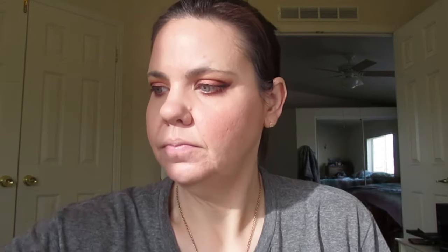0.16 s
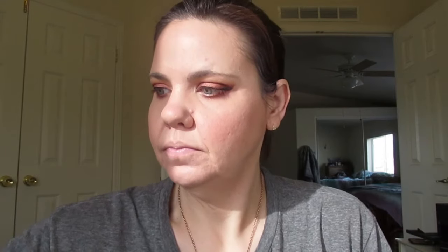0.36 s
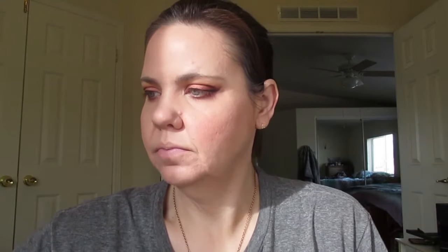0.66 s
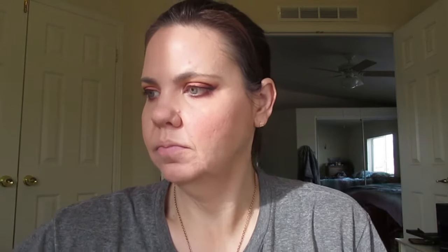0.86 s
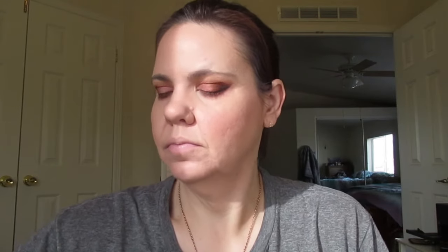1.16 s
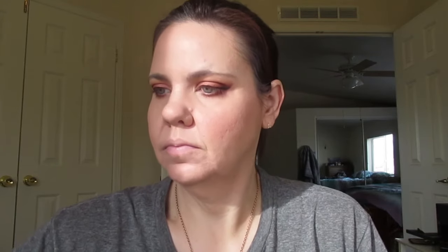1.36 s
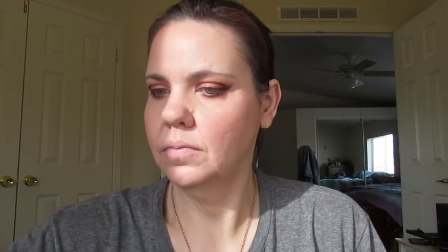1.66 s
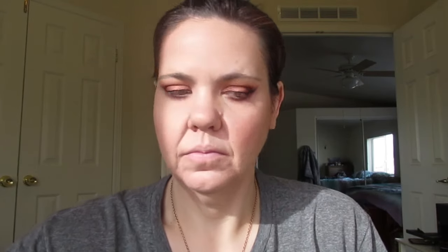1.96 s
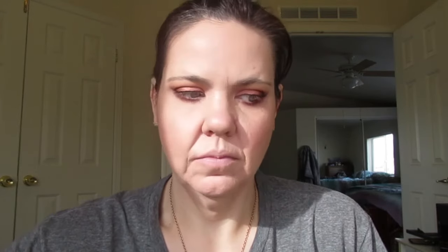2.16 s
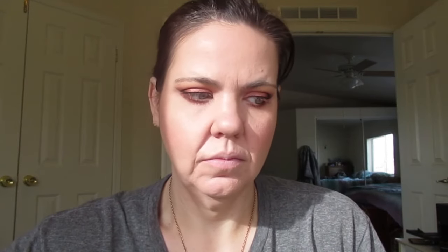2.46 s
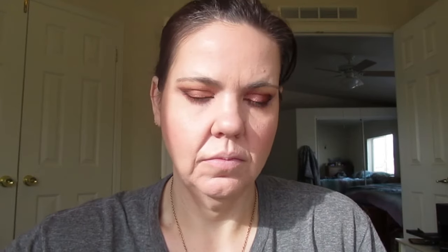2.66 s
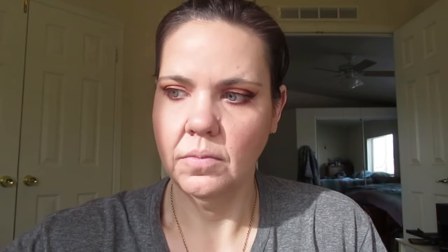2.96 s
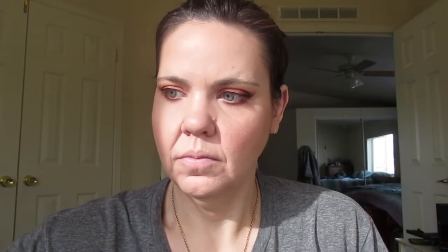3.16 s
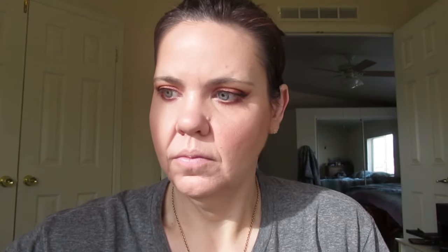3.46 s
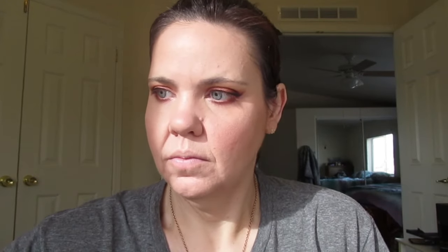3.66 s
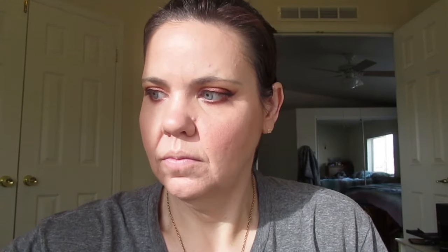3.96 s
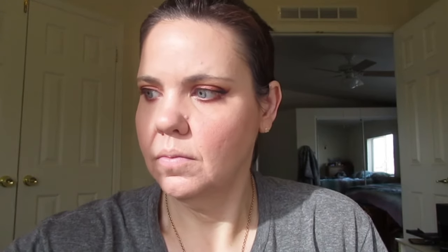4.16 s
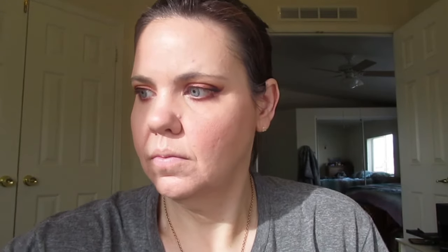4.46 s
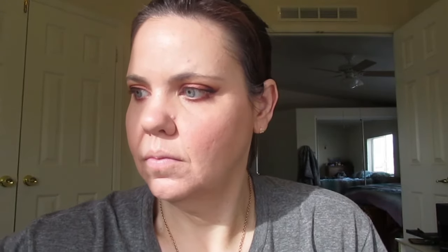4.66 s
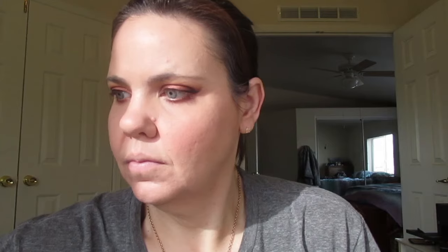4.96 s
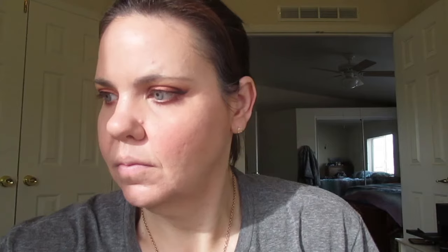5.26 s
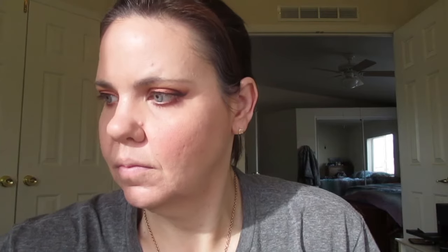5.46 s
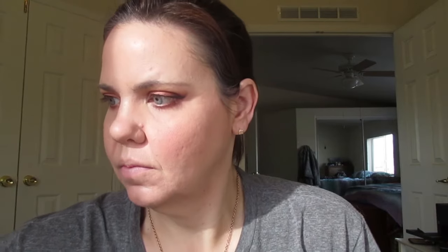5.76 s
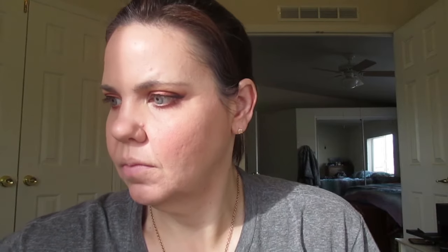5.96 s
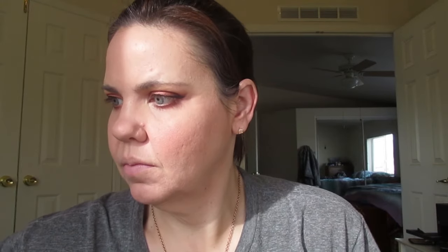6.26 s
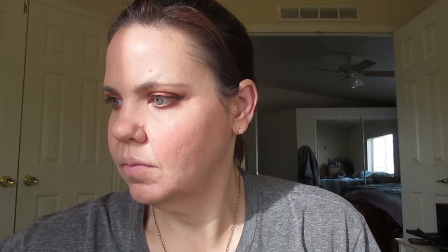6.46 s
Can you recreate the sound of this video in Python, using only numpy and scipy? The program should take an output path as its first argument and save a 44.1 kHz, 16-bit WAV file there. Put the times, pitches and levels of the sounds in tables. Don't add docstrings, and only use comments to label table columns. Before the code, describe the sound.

Close, uneven rummaging through small hard make-up containers, with hollow knocks, a sharp lid snap, short scrapes and faint room hum behind.

```python
import sys
import numpy as np
from scipy import signal
from scipy.fft import rfft, irfft
from scipy.io import wavfile

SR = 44100
rng = np.random.default_rng(int(sys.argv[2]) if len(sys.argv) > 2 else 0)


def natural_amplitude(level_db):
    exponent = np.asarray(level_db, float) / 20
    return 10 ** exponent


def transcribe(signal):
    frames = np.atleast_2d(signal).T
    limited = np.clip(frames, -1, 1)
    pcm = np.round(limited * 32767).astype(np.int16)
    wavfile.write(sys.argv[1], SR, pcm)


N = 291093
PLACES = 3

# [mode_hz, level_db]
PANEL_MODES = [(115, -48.5), (190, 0), (235, 4.5), (287, 1.5), (345, 3.5)]
# [mode_hz, level_db]
BOX_MODES = [(490, -4.5), (543, -27.5), (582, 4.5), (625, -3), (727, 5), (790, -9.5), (877, 3.5),
             (951, -10.5), (1017, 1.5)]
# [mode_hz, level_db]
CASE_MODES = [(1120, 3.5), (1330, 2.5), (1490, 0.5), (1600, -2), (1705, -2.5), (1880, 1), (2068, 3),
              (2280, 0), (2500, -0.5)]


def rms_one(x):
    return x / np.sqrt(np.mean(x ** 2) + 1e-20)


def at_hz(points, hz):
    table_hz, value = np.array(points)[:, 0], np.array(points)[:, 1]
    return np.interp(np.log(hz + 1), np.log(table_hz), value)


def coloured(x, spectrum):
    hz = np.arange(len(x) // 2 + 1) * SR / len(x)
    walled = [(spectrum[0][0] / 2, spectrum[0][1] - 30), *spectrum]
    return rms_one(irfft(rfft(x) * natural_amplitude(at_hz(walled, hz)), len(x)))


def drift(rate_hz):
    knots = rng.standard_normal(int(N / SR * rate_hz) + 2)
    return np.interp(np.arange(N) / SR * rate_hz, np.arange(len(knots)), knots)


def ring_s(hz):
    return 0.9 / np.sqrt(hz)


def house():
    # [freq_hz, level_db]
    hum_colour = [(12, -37), (20, -21), (64, -1), (86, -7.5), (176, 1.5), (282, -5.5), (315, -7.5),
                  (392, -3), (719, -10.5), (922, -8.5), (1210, -12), (1840, -11.5), (1990, -15.5),
                  (6890, -22.5), (14500, -28)]
    # [time_s, level_db]
    hum_swell = [(0, -43.5), (.45, -55.5), (1.5, -51), (3.55, -49), (4.7, -50), (6.6, -49)]
    # [line_hz, rms_db]
    mains_lines = [(60, -75), (118, -65.5)]
    t = np.arange(N) / SR
    out = coloured(rng.standard_normal(N), hum_colour) * natural_amplitude(np.interp(t, *np.transpose(hum_swell)))
    for hz, db in mains_lines:
        out += natural_amplitude(db + 0.5 + 2 * drift(7.7)) * np.sin(2 * np.pi * hz * t)
    return out


def room(x):
    # [freq_hz, t60_s]
    room_t60 = [(150, 0.39), (400, 0.29), (1000, 0.38), (2800, 0.35), (7300, 0.28), (15000, 0.13)]
    # [freq_hz, level_db]
    room_colour = [(150, 0), (400, 0.5), (700, -2), (1500, 2), (4000, 0), (12000, 0)]
    t, tail = np.arange(SR // 2) / SR, 0
    band_edges = np.geomspace(40, 20000, 10)
    for low, high in zip(band_edges, band_edges[1:]):
        centre_hz = np.sqrt(low * high)
        bandpass = signal.butter(2, [low, high], "band", fs=SR, output="sos")
        band = signal.sosfilt(bandpass, rng.standard_normal(len(t)))
        tail = tail + band * natural_amplitude(at_hz(room_colour, centre_hz) - 60 * t / at_hz(room_t60, centre_hz))
    tail = tail * np.clip((t - 0.003) / 0.0026, 0, 1)
    return natural_amplitude(-5.5) * signal.fftconvolve(x, tail / np.sqrt(np.sum(tail ** 2)))[:N]


def jolts():
    # [start_s, peak_db, swing_hz]
    shoves = [(1.586, -35.5, 115.3), (3.035, -28, 131.6), (3.109, -52, 135), (3.779, -38, 78.5),
              (4.125, -34.5, 118), (4.898, -35.5, 115), (5.543, -52, 128), (5.659, -35, 58.4),
              (5.678, -46, 119.5), (4.14, -41, 55), (3.7, -46, 101), (6.399, -45, 108)]
    since = np.maximum(np.arange(N) / SR - np.array(shoves)[:, :1], 0)
    db, hz = np.array(shoves).T[1:, :, None]
    envelope = natural_amplitude(db - 5.5 - 60 * since / 0.45) * (1 - np.exp(-since / 0.014))
    return (envelope * np.sin(2 * np.pi * hz * since)).sum(axis=0)


def strokes(t):
    # [time_s, level_db]
    drags = [
        [(3.6, -58), (3.71, -43.5), (3.83, -35.5), (4.0, -31), (4.2, -36), (4.28, -44), (4.42, -69)],
        [(5.42, -43), (5.49, -37), (5.71, -40.5), (5.85, -42), (6.1, -42.5), (6.28, -44.5), (6.44, -44),
         (6.6, -93)],
    ]
    # [start_s, length_s, rub_db, hiss_db]
    scuffs = [
        (0.0, 0.0082, -26, -56),
        (0.703, 0.078, -45, -51.5),
        (2.132, 0.019, -39.5, -43),
        (2.407, 0.064, -49, -72),
        (3.666, 0.0052, -28, -48),
        (3.727, .006, -19.5, -48),
        (3.79, 0.036, -25.5, -59),
        (4.333, 0.0079, -32, -45),
        (4.904, 0.028, -38.5, -42.5),
        (5.274, 0.049, -22, -33.5),
    ]
    rub_over_hiss_db = 6.5
    rise_db_per_s, fall_db_per_s = 475, 304
    gain = np.zeros((2, N))
    for drag in drags:
        s, db = np.transpose(drag)
        fade = np.clip(np.minimum(t - s[0], s[-1] - t) / 0.02 + 0.5, 0, 1)
        gain += fade * natural_amplitude(np.interp(t, s, db) + np.array([[rub_over_hiss_db], [0]]))
    for s, length, *db in scuffs:
        lost_db = rise_db_per_s * np.maximum(s - t, 0) + fall_db_per_s * np.maximum(t - s - length, 0)
        gain += natural_amplitude(np.array(db)[:, None] - lost_db)
    return gain


def slides():
    # [freq_hz, density_db_per_hz]
    rub_colour = [(59, -43), (100, -16.5), (289, 0.5), (414, -6), (564, 1.5), (795, -1.5), (943, 3.5),
                  (1520, -5), (2500, -5.5), (4190, -21), (6000, -21.5), (7800, -46), (13200, -120)]
    # [freq_hz, density_db_per_hz]
    hiss_colour = [(2060, -11.5), (3500, -12), (4090, -16), (6890, -13), (10000, -17.5), (11700, -18.5),
                   (14500, -23.5)]
    t = np.arange(N) / SR
    rub_gain, hiss_gain = strokes(t)
    slips_per_s = 3500
    slips = (rng.random(N) < slips_per_s / SR) * rng.laplace(size=N) * natural_amplitude(5.1 * drift(35))
    rub = coloured(slips, rub_colour)
    hz, db = np.array(PANEL_MODES + BOX_MODES + CASE_MODES).T[:, :, None]
    ring_t = t[:SR // 5]
    body = (natural_amplitude(db - 60 * ring_t / ring_s(hz)) * np.sin(2 * np.pi * hz * ring_t)).sum(axis=0)
    boxed = rms_one(signal.fftconvolve(rub, body)[:N])
    hiss = coloured(rng.standard_normal(N), hiss_colour) * natural_amplitude(drift(40))
    return natural_amplitude(-9) * (rub_gain * rms_one(rub + 0.4 * boxed) + hiss_gain * hiss)


def pings():
    # [start_s, peak_db, pitch_hz]
    case_pings = [(.0625, -8, 1900), (.049, -14, 3000), (.108, -20, 3220), (.207, -18, 1187),
                  (.519, -45, 2680), (1.573, -2, 1530), (1.826, -5, 1520), (1.887, -21, 2540),
                  (1.9235, -5.5, 1150), (1.9884, -11, 1006), (2.349, -31, 2430), (2.466, -11.5, 1603),
                  (2.467, -19, 3460), (2.693, -28, 2260), (2.889, -19, 2310), (3.033, -20, 1560),
                  (3.033, -9, 4560), (3.06, -13, 2700), (3.787, -17, 3130), (3.1164, -10, 1063),
                  (3.168, -20, 2380), (3.346, -24, 2060), (3.786, -13, 1040), (1.827, -15, 2170),
                  (4.14, -17, 1050), (5.536, -10, 2050), (5.547, -15.5, 2600), (5.855, -24.5, 1930),
                  (5.27, -19, 1960), (5.308, -20, 1800)]
    # [start_s, peak_db, pitch_hz]
    dry_taps = [(1.826, -11.5, 293), (2.963, -13, 700), (3.166, -12, 670), (3.418, -23, 625),
                (3.66, -15, 285), (3.712, -16, 600), (3.738, -7, 281), (3.756, -14, 290),
                (4.297, -14.5, 286), (5.536, -16, 197), (5.715, -13.5, 720), (6.41, -26, 200),
                (6.05, -31, 1300), (3.859, -15, 1070), (3.77, -14, 700), (.065, -12, 550)]
    t, out = np.arange(SR // 6) / SR, np.zeros(N + SR)
    for table, t60_cycles in [(case_pings, 45), (dry_taps, 27)]:
        for s, db, hz in table:
            pair = np.sin(2 * np.pi * hz * t) + 0.21 * np.sin(2 * np.pi * hz * 1.077 * t)
            envelope = natural_amplitude(db - 3 - 60 * t * hz / t60_cycles) * (1 - np.exp(-t * hz / 0.94))
            at = round(s * SR)
            out[at:at + len(t)] += envelope * pair
    return out[:N]


def contacts():
    # [start_s, strength_db, hardness_db, pitch_hz]
    thuds = [(.519, -43, -15, 690), (.687, -44, -28, 600), (.77, -43, -24, 497), (.793, -29.5, -49, 430),
             (.931, -32.5, -48, 636), (1.826, -4.5, -28.5, 770), (2.009, -31, -22, 573),
             (2.536, -34.5, -24, 573), (2.753, -31.5, -28, 606), (3.034, -4.5, -12.5, 510),
             (3.083, -15.5, -17, 707), (3.214, -30, -21, 690), (3.326, -15, -22, 634),
             (3.725, -7, -54, 454), (3.73, -12.5, -28, 590), (4.14, -19, -14, 600),
             (4.297, -8.5, -28.5, 491), (4.339, -16.5, -22, 805), (4.893, -28, -15, 496),
             (5.547, -17.5, -30, 590), (5.616, -23.5, -16, 745), (6.316, -34, -11, 630),
             (6.396, -29, -17, 540), (6.419, -29, -23, 560)]
    # [start_s, strength_db, hardness_db, pitch_hz]
    bumps = [(.129, -16.5, -13, 592), (.208, -11, -17, 735), (1.923, -7, -17.5, 703), (2.13, -39, -14, 662),
             (2.351, -27.5, -19.5, 570), (2.61, -30, -33, 603), (2.693, -18.5, -24.5, 575),
             (2.787, -30, -49, 644), (2.874, -30.5, -18, 587), (2.89, -18, -16, 606),
             (3.166, -14.5, -28, 680), (3.278, -16.5, -35, 745), (3.365, -15, -28, 750),
             (3.416, -20, -28, 655), (3.659, -13.5, -45, 565), (3.77, -17.5, -32, 600),
             (4.128, -14, -31, 610), (4.312, -15.5, -18.5, 606), (5.255, -22, -30, 915),
             (5.536, -13, -23, 560), (5.562, -14.5, -27, 610), (5.585, -17, -24, 775),
             (5.686, -22, -42, 800), (5.855, -33.5, -13, 680), (6.538, -30, -46, 604)]
    # [start_s, strength_db, hardness_db, pitch_hz]
    clacks = [(.003, -23, -16.5, 660), (.048, -5, -15.5, 620), (.063, 0, -23.5, 573),
              (.089, -8.5, -30, 630), (.108, -6.5, -15, 744), (.144, -31, -32, 593), (1.888, -15, 2, 554),
              (1.972, -1, -20.5, 777), (1.989, -14.5, -13, 650), (2.18, -29, -11, 600),
              (2.303, -35.5, -13.5, 570), (2.468, -11.5, -16, 561), (2.656, -29.5, -33, 530),
              (2.964, -21, -28, 695), (3.11, -9, -27, 750), (3.117, -7.5, -25.5, 760),
              (3.346, -13, -20, 609), (3.786, -8, -19.5, 870), (3.805, -12, -25, 736),
              (3.859, -25.5, -7, 1136), (5.273, -19.5, -15, 590), (5.715, -21.5, -24, 747),
              (6.136, -41, -10, 910)]
    # [start_s, strength_db, hardness_db, box_db, pitch_hz]
    lids = [
        (1.574, -12, -2.5, -22, 1530),
        (1.583, -17, -17, -8, 1620),
        (5.281, -20, -14, -27, 1616),
        (6.58, -39.5, -40, -47, 1280),
    ]
    usual_hardness_db = -19.5
    # panel dB, case dB, case dB per dB of hardness
    kinds = [(thuds, -7.5, -11.5, 0.14), (bumps, -13, -7.5, 0.19), (clacks, -24, -8, 0.41)]
    rows = []
    for table, panel_db, case_db, share in kinds:
        for s, db, hard_db, hz in table:
            bright_db = share * (hard_db - usual_hardness_db)
            rows.append((s, db, db + panel_db, db + case_db + bright_db, db + hard_db, hz))
    for s, db, hard_db, box_db, hz in lids:
        rows.append((s, box_db, db - 20, db, db + hard_db, hz))
    return sorted(rows)


def ring(modes, t, note_hz, rise_s, tilt_db=0):
    hz, db = np.array(modes).T[:, :, None]
    strength, detune, phase = rng.standard_normal((3, len(modes), 1))
    near_db = 13.0 * np.exp(-(np.log2(hz / note_hz) / 0.45) ** 2)
    start_db = db + near_db + tilt_db * np.log2(hz / 1500) + 2 * strength
    unlike = 1 + detune * hz / 80000
    waves = natural_amplitude(start_db - 60 * t / ring_s(hz)) * np.sin(2 * np.pi * hz * unlike * t + 2 * phase)
    blow = waves.sum(axis=0) * (1 - np.exp(-t / rise_s))
    return blow / np.abs(blow).max()


def knocks():
    # [freq_hz, density_db_per_hz]
    crack_colour = [(2500, -30), (4000, -4), (6000, 1.5), (8000, 4), (11000, -1), (15000, -6)]
    # [freq_hz, density_db_per_hz]
    shell_colour = [(1500, 5), (2300, -11), (3000, -3), (3700, -7.5), (4500, -12.5), (6000, -14.5),
                    (9000, -26)]
    t, out = np.arange(SR // 6) / SR, np.zeros((PLACES, N + SR))

    def dying(t60_s):
        return natural_amplitude(-60 * t / t60_s)

    for k, (s, box_db, panel_db, case_db, crack_db, hz) in enumerate(contacts()):
        own = (hz, 0.5)
        low = hz < 1100
        hardness = np.clip(crack_db - case_db + 13.5, -15, 8)
        slowness = natural_amplitude(-0.35 * hardness)
        blow = natural_amplitude(panel_db + 2.5) * ring(PANEL_MODES, t, hz, rise_s=0.0025)
        blow += natural_amplitude(box_db - 1.5) * ring(BOX_MODES + [own] * low, t, hz, rise_s=0.0015 * slowness)

        first, rebound = (ring(CASE_MODES + [own] * (not low), t, hz, rise_s=0.00089 * slowness,
                               tilt_db=0.36 * hardness) for _ in range(2))
        rebound_delay = round(rng.uniform(0.002966, 0.008) * SR)
        blow += natural_amplitude(case_db + 1.0) * (first + 0.91 * np.roll(rebound, rebound_delay))

        bulk = np.clip(panel_db - crack_db + 11.5, -12, 14)
        dulled = [(f, db - 0.39 * bulk * np.log2(f / 6000)) for f, db in crack_colour]
        shell = coloured(rng.standard_normal(len(t)), shell_colour)
        splinters = coloured(rng.standard_normal(len(t)), dulled)
        blow += natural_amplitude(case_db - 13.0 + 0.76 * hardness) * shell * (dying(0.029) + 0.49 * dying(0.24))
        crack_envelope = (1 - np.exp(-t / 0.00058)) * (dying(0.019) + 0.37 * dying(0.11))
        blow += natural_amplitude(crack_db - 4.5) * splinters * crack_envelope

        after_hz = [582, 625] if low else [hz, 1.075 * hz]
        after_ring = np.sin(2 * np.pi * np.outer(after_hz, t)).sum(axis=0) * dying(0.26)
        blow += natural_amplitude(box_db - 24.0 if low else case_db - 17.0) * after_ring
        blow += natural_amplitude(panel_db - 5.5) * dying(0.14) * np.sin(2 * np.pi * 287 * t)
        at = round(s * SR)
        out[k % PLACES, at:at + len(t)] += blow * (1 - (t / t[-1]) ** 2)
    return signal.sosfilt(signal.butter(3, 120, "high", fs=SR, output="sos"), out[:, :N])


def scene():
    drawer = [*(knocks() + pings() / PLACES), slides()]
    return (sum(place + room(place) for place in drawer) + jolts() + house())[None]


def low_pass(x):
    return signal.sosfilt(signal.butter(12, 15960, fs=SR, output="sos"), x)


def record(dry):
    rounded = 1.415 * np.tanh(dry / 1.558)
    top_cut = signal.cheby2(10, 45, 15600, fs=SR, output="sos")
    mix = signal.sosfilt(top_cut, rounded)
    return low_pass(mix)


dry = scene()
out = record(dry)
transcribe(out)
```